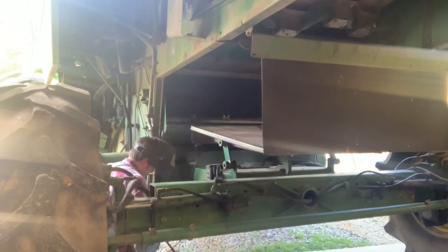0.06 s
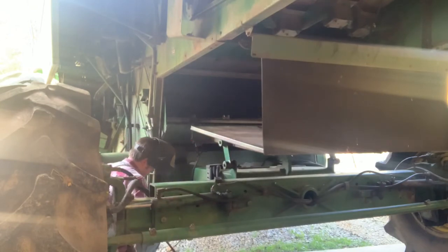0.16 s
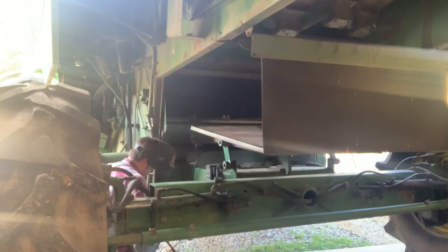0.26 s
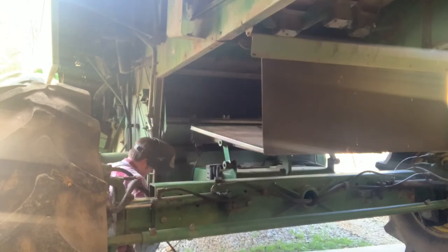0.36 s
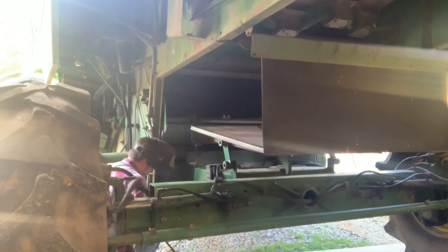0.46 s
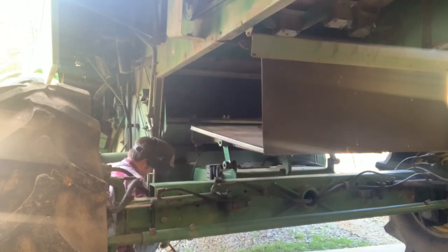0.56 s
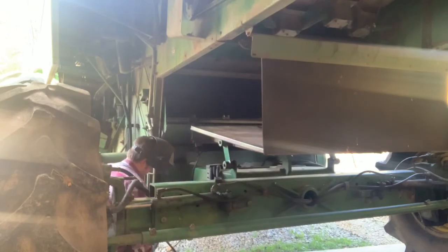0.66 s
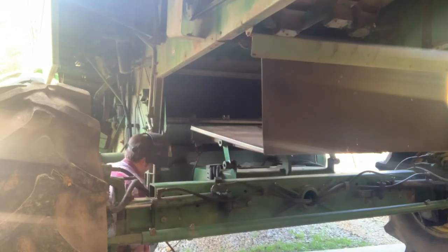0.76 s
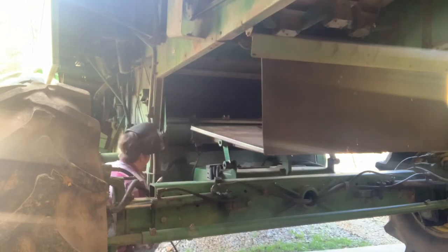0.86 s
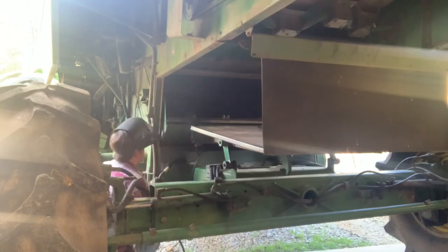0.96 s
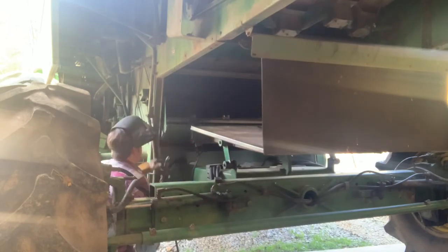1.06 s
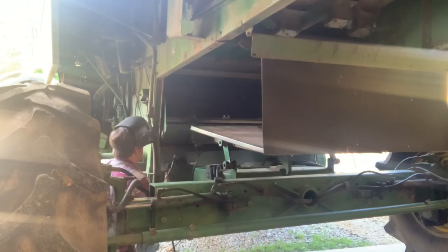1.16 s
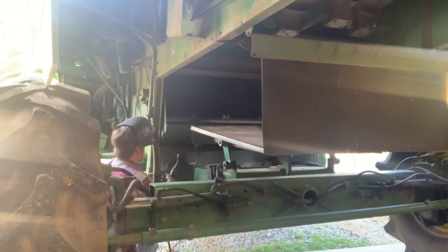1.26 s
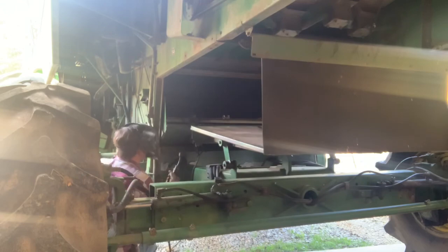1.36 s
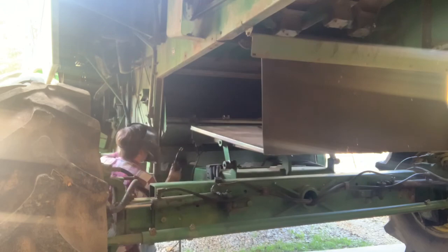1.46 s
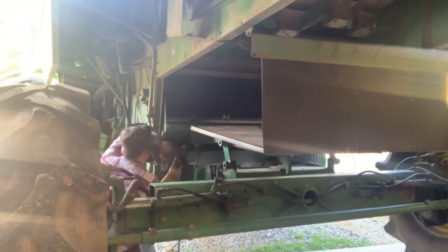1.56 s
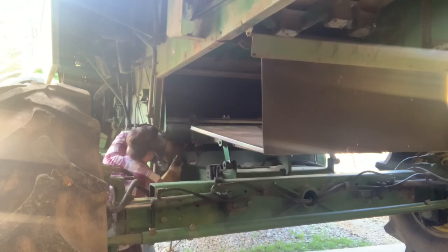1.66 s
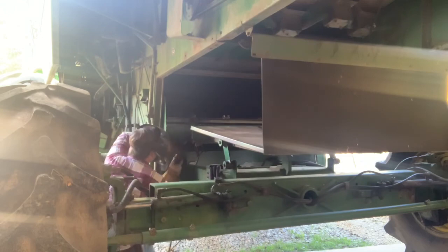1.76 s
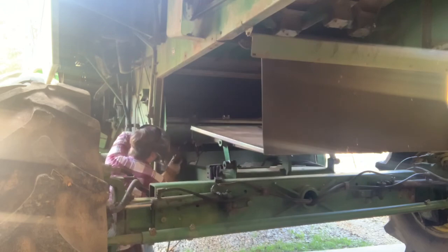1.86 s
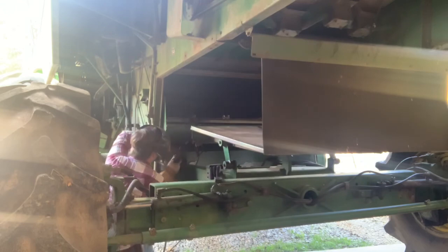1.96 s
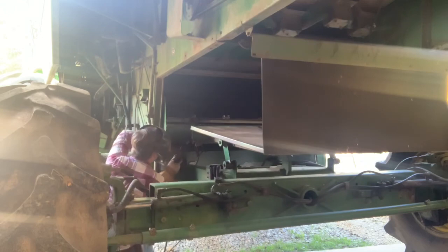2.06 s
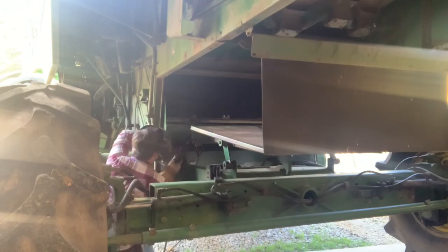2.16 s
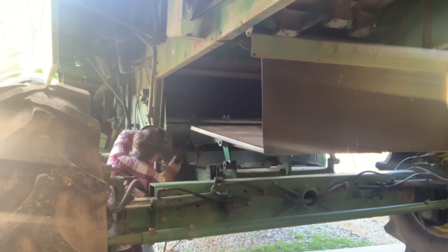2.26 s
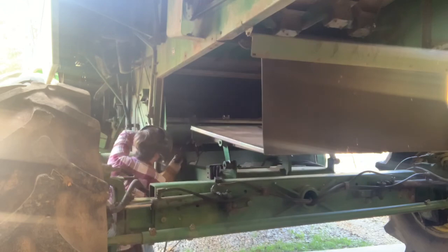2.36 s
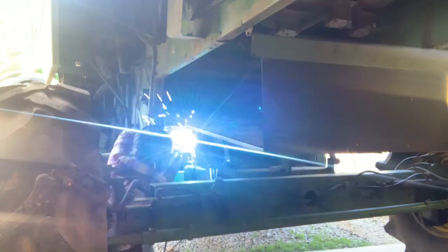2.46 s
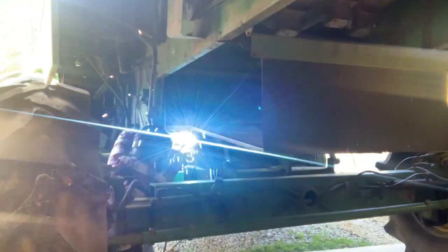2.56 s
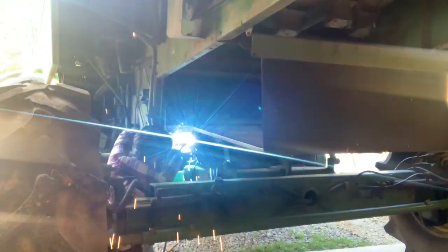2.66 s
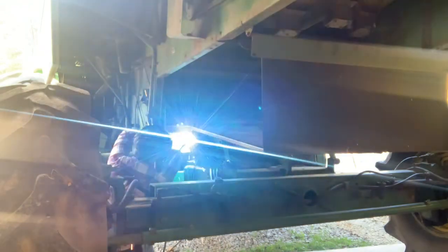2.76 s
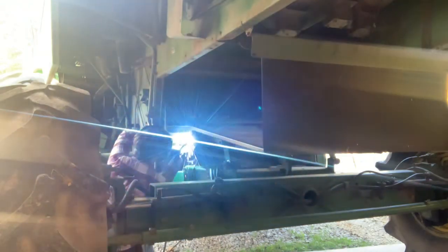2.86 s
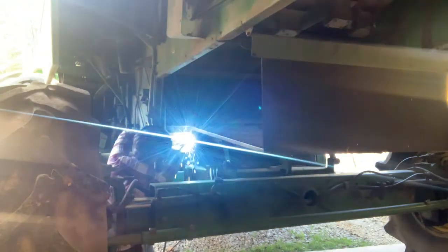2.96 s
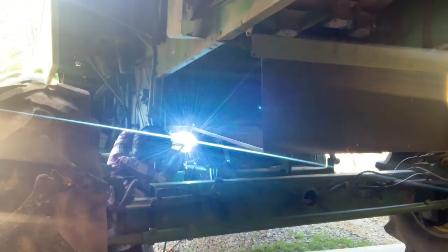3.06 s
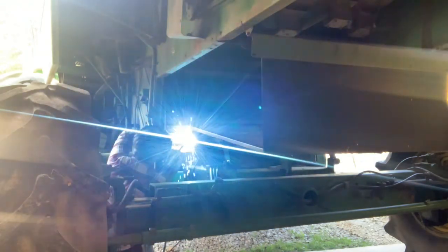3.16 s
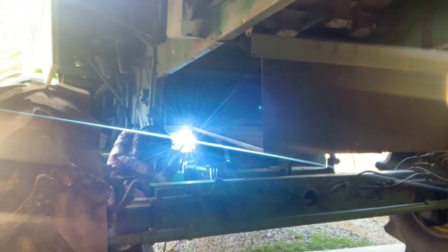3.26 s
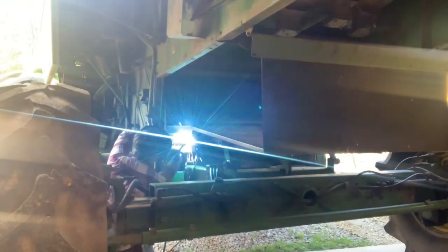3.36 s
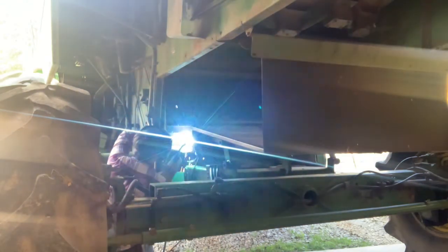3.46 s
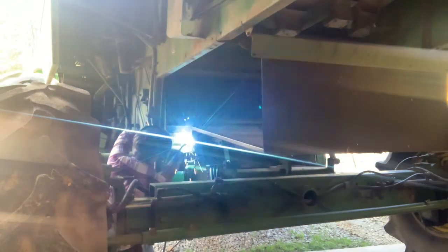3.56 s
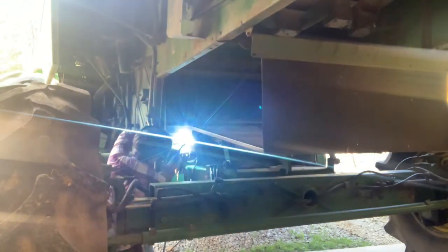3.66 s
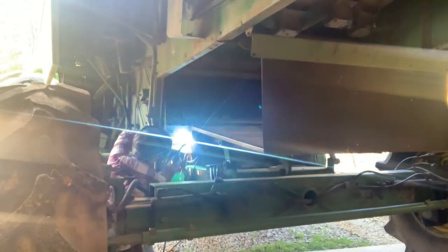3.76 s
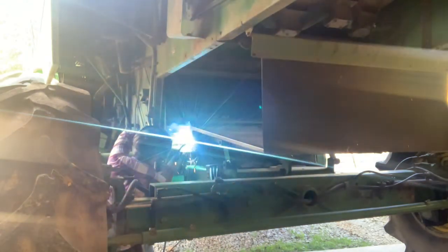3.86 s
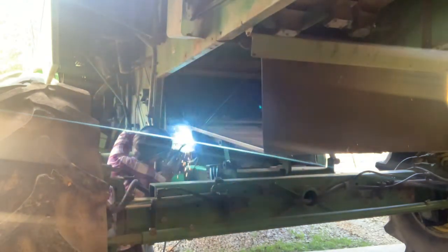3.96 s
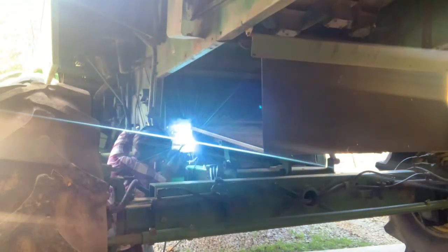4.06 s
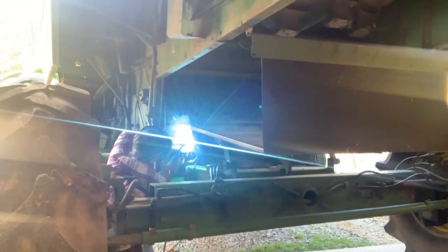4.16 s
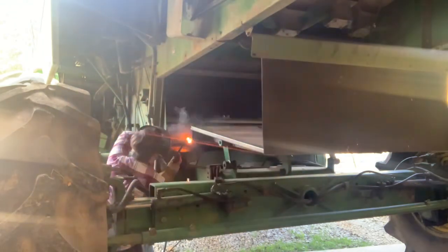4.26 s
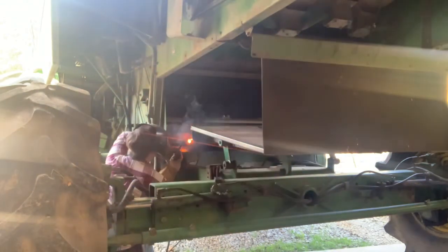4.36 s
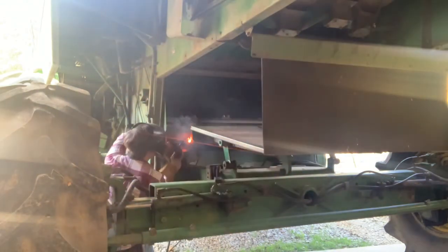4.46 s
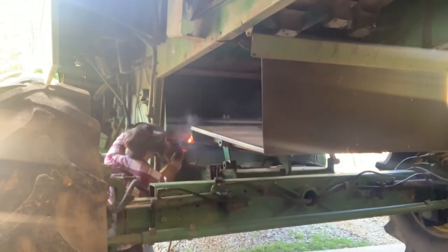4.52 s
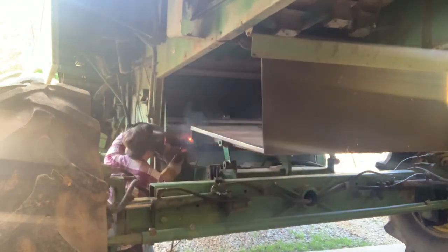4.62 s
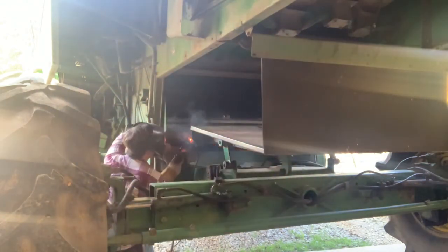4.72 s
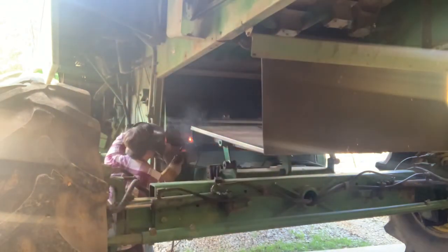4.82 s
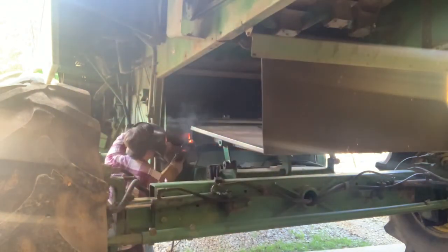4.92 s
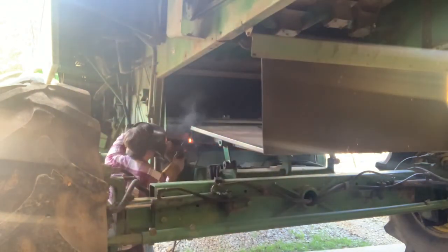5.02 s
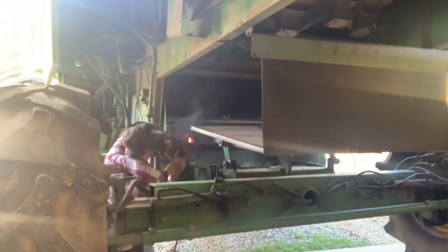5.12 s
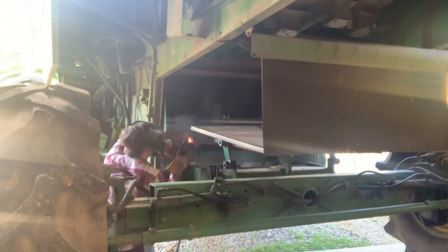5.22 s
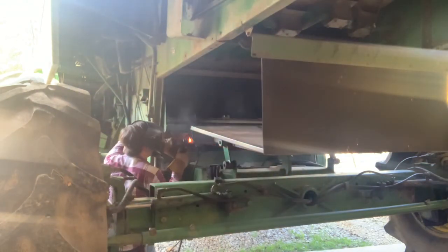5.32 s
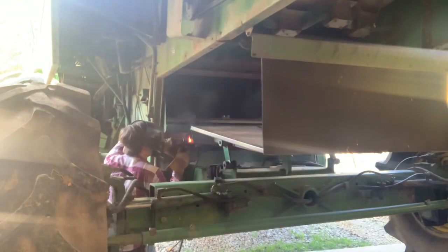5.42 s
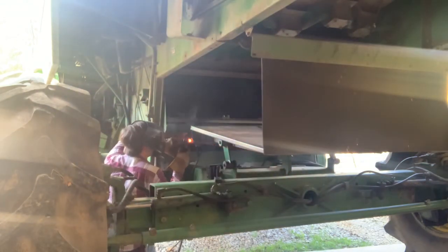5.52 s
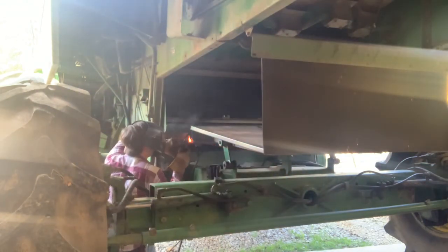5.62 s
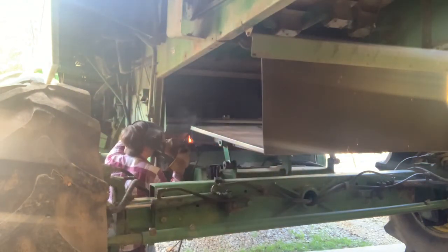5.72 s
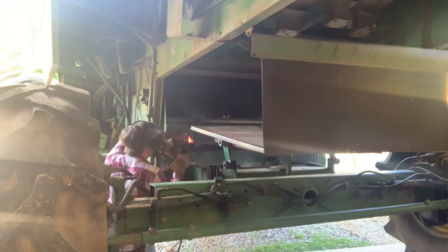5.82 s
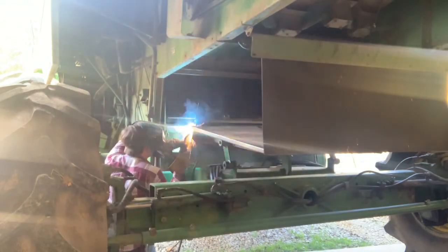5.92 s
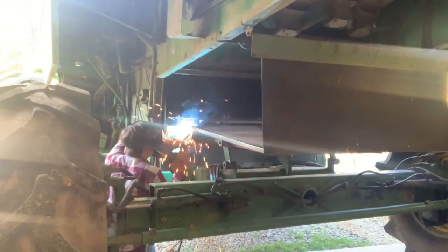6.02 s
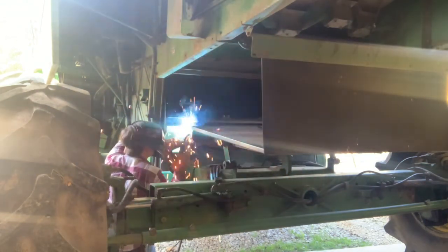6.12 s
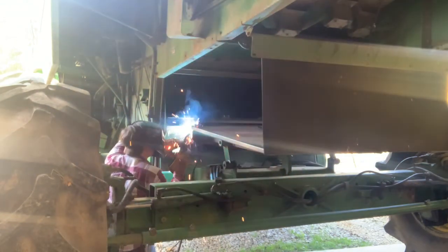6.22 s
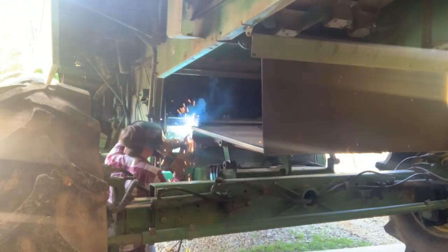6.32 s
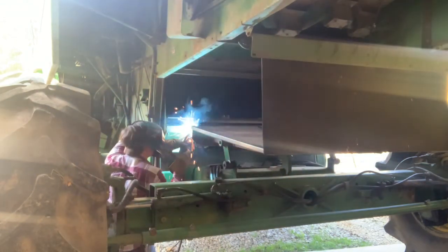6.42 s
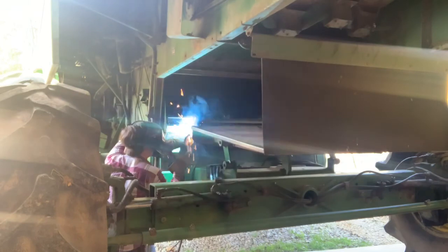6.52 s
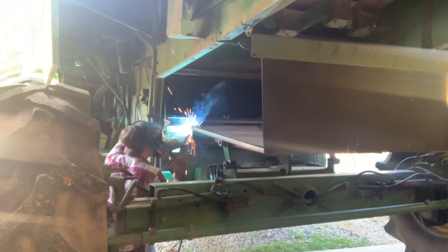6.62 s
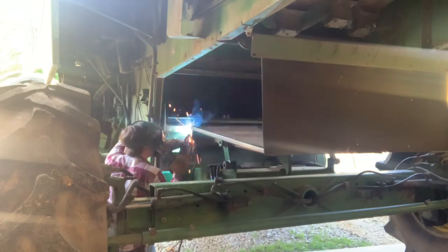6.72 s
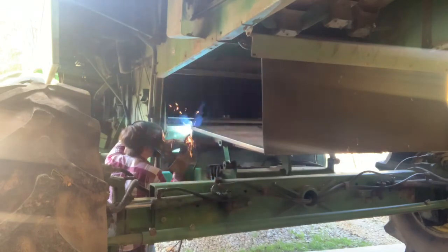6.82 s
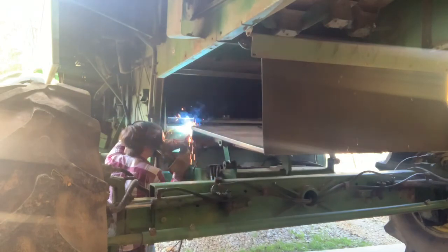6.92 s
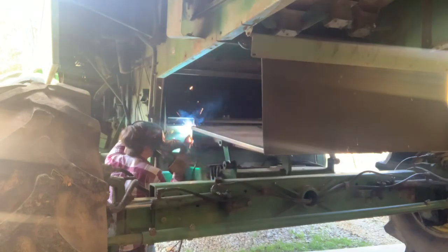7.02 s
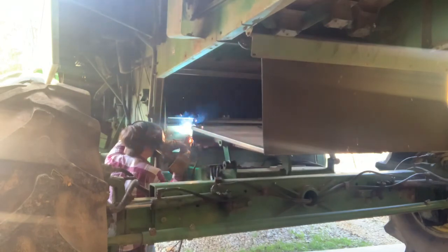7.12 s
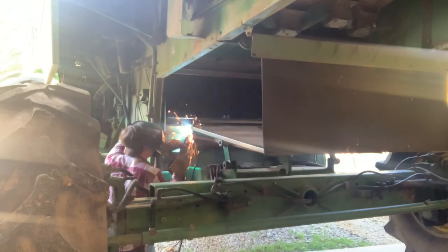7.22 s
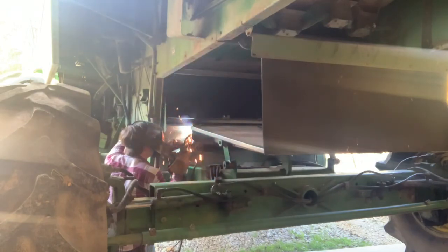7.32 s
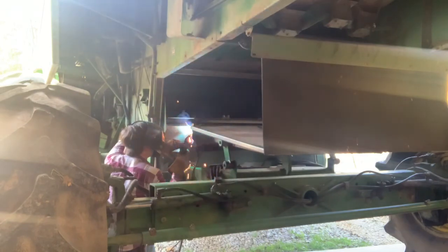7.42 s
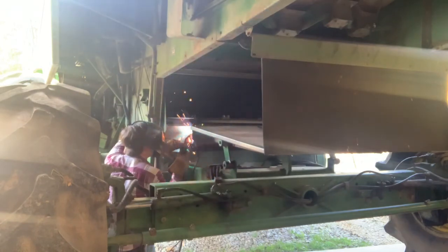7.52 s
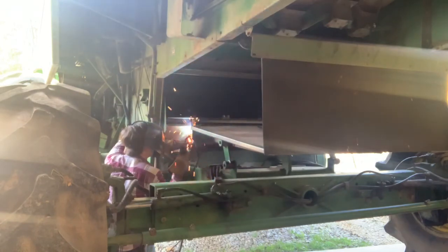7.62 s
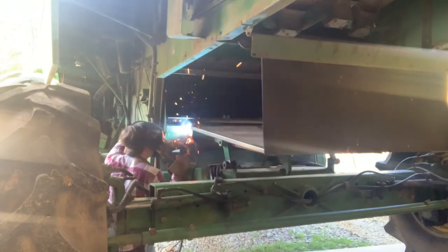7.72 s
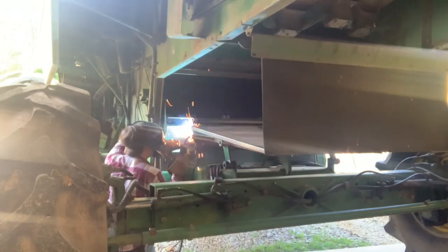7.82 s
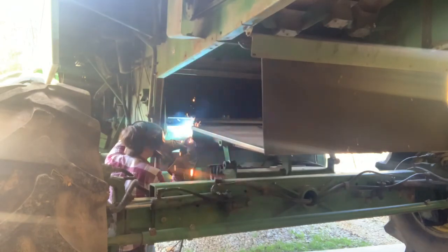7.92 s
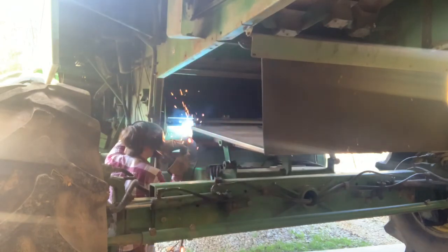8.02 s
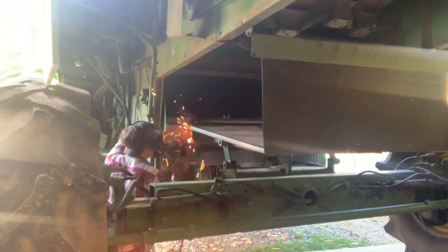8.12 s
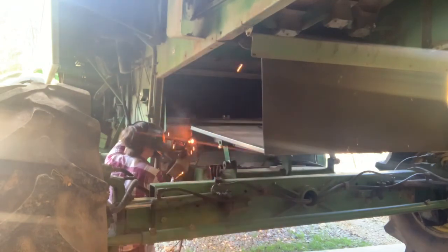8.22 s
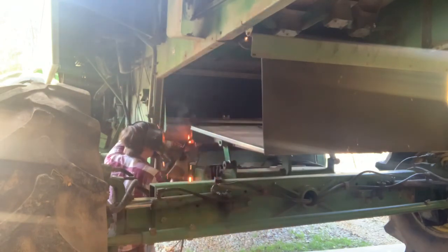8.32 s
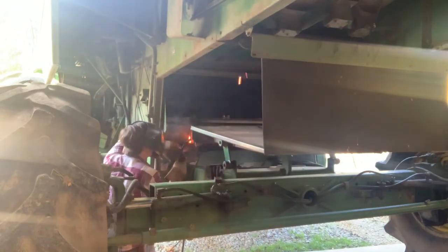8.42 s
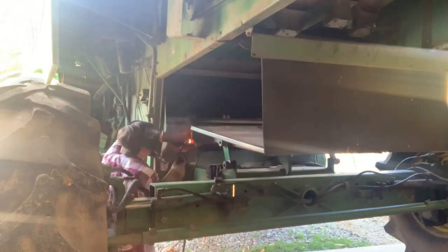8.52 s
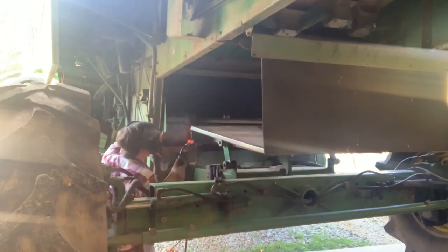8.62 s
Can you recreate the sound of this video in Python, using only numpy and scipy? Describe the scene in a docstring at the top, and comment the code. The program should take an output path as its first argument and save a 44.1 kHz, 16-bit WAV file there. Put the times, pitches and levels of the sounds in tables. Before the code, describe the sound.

Steady fan tone with soft air rush and motor drone, heard from a few metres off in an open shed. Light steel knocks and scrapes precede a first weld: violent pops, then uneven bright sizzling that rings nearby panels. It cuts off abruptly, leaving the hum. A second, grainier weld crackles for two seconds with a low gas roar beneath, stops suddenly, and a few hot slag ticks follow.

```python
"""A welder's cooling fan hums in an open shed, its pitch sagging under load, over a motor drone and faint whistles.
After a tick of handling and a brief clatter of steel gear, an arc is struck twice inside a large farm machine:
sharp pops, then a frying crackle that rings the steel panels around the seam. Hot slag ticks after the second weld.
The air, roar and gas flares are coloured noise, the fan and motor are tones, and every snap, pop, knock and tick
is an impulse or a tiny spit of noise sent through the ring of steel and the echoes of the shed."""
import sys
import numpy as np
from scipy import signal
from scipy.fft import rfft, irfft
from scipy.io import wavfile
from scipy.ndimage import uniform_filter1d

SR = 44100
rng = np.random.default_rng(int(sys.argv[2]) if len(sys.argv) > 2 else 0)


def transcribe(signal):
    """Save signal, clipped to [-1, 1], as a 16-bit WAV file at the path in sys.argv[1]."""
    frames = np.atleast_2d(signal).T
    limited = np.clip(frames, -1, 1)
    pcm = np.round(limited * 32767).astype(np.int16)
    wavfile.write(sys.argv[1], SR, pcm)


N = 382788
TIME, FREQS = np.arange(N) / SR, np.fft.rfftfreq(N, 1 / SR)

# The two welds. Each row: first touch, arc alight and arc broken in seconds, scratch of the touch in dB
# against the burning arc, surge on lighting in dB.
ARC_TIMES = [(2.358, 2.432, 4.187, -4, 6.5), (5.911, 5.964, 8.128, -7.5, 0)]


def amp(db):
    """Decibels to gain."""
    return 10 ** (np.asarray(db) / 20)


def unit(x):
    """Scales to an rms of one."""
    return x / np.sqrt(np.mean(x ** 2) + 1e-20)


def read(points, freqs=FREQS):
    """A spectrum table, joined by straight lines on a log-frequency axis."""
    hz, value = np.transpose(points)
    return np.interp(np.log(freqs + 1), np.log(hz), value)


def follow(rows):
    """The columns of a curve table at every sample."""
    seconds, *columns = np.transpose(rows)
    return [np.interp(TIME, seconds, column) for column in columns]


def add(mix, s, sound):
    """Mixes a stereo sound in at time s, cut off at the end of the mix."""
    part = mix[:, round(s * SR):][:, :sound.shape[1]]
    part += sound[:, :part.shape[1]]


def wander(rate):
    """Random drift of rms one, its movement falling away above rate in Hz."""
    slow = FREQS[:1000]
    noise = rng.standard_normal((len(slow), 2)) @ [1, 1j]
    curve = unit(irfft(noise / np.sqrt(1 + (slow / rate) ** 4), 8 * len(slow)))
    return np.interp(TIME, np.linspace(0, TIME[-1], len(curve)), curve)


def lifts(resonances, freqs):
    """Decibels that a table of resonances (Hz, width in Hz, lift in dB) adds at each frequency."""
    return sum(db / (1 + (2 * (freqs - hz) / width) ** 2) for hz, width, db in resonances)


def tilted(db_per_octave, freqs):
    """Decibels that brighten or dull the treble, sloping above 1500 Hz."""
    return db_per_octave * np.log2(np.maximum(freqs, 1500))


def air(colour):
    """Stereo noise of the given colour in the shed, most alike left and right in the low mids; mid rms of one."""
    # Likeness of left and right. Each row: frequency in Hz, correlation from 0 to 1.
    likeness_points = [(60, 0), (130, 0.48), (300, 0.62), (640, 0.69), (1400, 0.44), (3100, 0.32),
                       (7000, 0.14)]
    # Peaks and dips the shed's echoes leave in steady air. Each row: frequency and width in Hz, lift in dB.
    shed_rings = [(277, 18, 5.5), (526, 24, 2), (598, 24, 7.5), (620, 22, -4.5), (838, 49, 2.5),
                  (875, 21, -1.5), (1074, 44, -6), (1274, 37, -2), (1394, 43, -7.5), (1440, 55, 6.5),
                  (1625, 28, 7), (2060, 64, 4.5), (2520, 90, -3), (3000, 90, 2), (3240, 80, -12),
                  (3250, 80, 7), (3630, 200, -6), (6560, 260, 3.5), (7700, 98, 7)]
    common, apart = rfft(rng.standard_normal((2, N)))
    likeness = np.clip(read(likeness_points), -1, 1)
    mid = common * np.sqrt(1 + likeness)
    side = apart * np.sqrt(1 - likeness)
    gain = amp(read(colour) + lifts(shed_rings, FREQS))
    pair = irfft(np.array([mid + side, mid - side]) * gain, N)
    return pair / pair.mean(0).std()


def causal(db):
    """Minimum-phase response with the given gain: it rings after a click, never before."""
    log_gain = np.log(amp(np.maximum(db, db.max() - 80)))  # an 80 dB floor
    circle = np.r_[log_gain, log_gain[-2:0:-1]]
    return np.exp(np.conj(signal.hilbert(circle)))[:len(db)]


def evened(z, freqs):
    """Echoes cut a comb, left coarser in the treble, but the broad colour is made even."""
    fine, coarse = (uniform_filter1d(abs(z) ** 2, size=bins) for bins in (70, 180))
    return z * causal(-10 * np.log10(np.where(freqs < 3500, fine, coarse)))


def echoes(panel_s, panel_db, shed_db, side_db, shed_t60, side_t60=0.15, size=16384):
    """Spectrum of the path to the microphones: direct snap, a flurry off near panels, the shed's tail."""
    # Sideways share of the echoes. Each row: frequency in Hz, side minus mid in dB before side_db is added.
    side_share = [(300, -10), (1000, -6.5), (2000, -8), (2900, -13), (4500, -0.5), (8000, -9),
                  (13500, -6.5)]
    t, freqs = np.arange(size) / SR, np.fft.rfftfreq(size, 1 / SR)
    near, far, across = rng.standard_normal((3, size))
    near = near * np.exp(-t / panel_s)
    far = far * amp(-60 * t / shed_t60) * (1 - np.exp(-t / 0.00078))
    across = across * amp(-60 * t / side_t60) * (1 - np.exp(-t / .003))
    snap = (t == 0) * 1.0
    for db, part in [(panel_db, near), (shed_db, far)]:
        snap += amp(db) * part / np.linalg.norm(part)  # levels against the direct snap
    mid, side = (evened(rfft(part), freqs) for part in (snap, across))
    side = side * amp(read(side_share, freqs) + side_db)
    return freqs, np.array([mid + side, mid - side])


def ring(path, colour_db):
    """Stereo response to one click of the given colour, with unit energy in the mid."""
    response = irfft(path * causal(colour_db))
    return response / np.linalg.norm(response.mean(0))


def crack(response, db, length, count=8, size=2048):
    """A few fading snaps within length seconds, evened in colour; db spreads their energy over 3 ms."""
    snaps = np.zeros(size)
    place, sign = rng.random((2, count))
    at = np.clip((np.arange(count) + place) / count * length * SR, 0, size - 1).astype(int)
    snaps[at] = np.sign(sign - .5) * np.exp(-np.arange(count) / count)
    z = rfft(snaps)
    broad_power = uniform_filter1d(abs(z) ** 2, size=40)
    snaps = irfft(z * causal(-10 * np.log10(broad_power + 1e-9)))
    sound = signal.fftconvolve(response, snaps[None], axes=1)
    return amp(db) * np.sqrt(3 * SR / 1000) * sound / np.linalg.norm(sound.mean(0))


def fan_pitch(waver_hz=0.57):
    """The fan slows while an arc loads the supply and recovers when it breaks, with the rotor's lag."""
    idle_hz, sag_hz, lag_s = 407.5, 4.0, 0.079
    load = sum(1.0 * ((TIME > touch) & (TIME < broken)) for touch, _, broken, *_ in ARC_TIMES)
    keep = np.exp(-1 / (lag_s * SR))
    sag = sag_hz * signal.lfilter([1 - keep], [1, -keep], load)
    return idle_hz - sag + waver_hz * wander(1.94)


def fan(flutter=0.17, flutter_hz=12, tone_db=0.1, stray=0.17):
    """The blade tone flutters in its own turbulent air; stray echoes differ between the microphones."""
    # Swells and dips of the blade tone. Each row: time in seconds, level in dB before the tone_db trim.
    blade_level = [(0.0, -38), (0.05, -35.5), (0.19, -40), (1.35, -36.5), (1.4, -32.5), (1.52, -38),
                   (4.28, -36), (4.42, -39), (4.92, -36), (4.99, -30.5), (5.06, -37), (5.25, -38.5),
                   (5.7, -37.5), (5.78, -44), (5.85, -35), (7.91, -38), (8.12, -35), (8.68, -40.5)]
    # Rush of the fan's air in the shed. Each row: frequency in Hz, relative level per Hz in dB.
    rush_colour, rush_db = [(350, -23), (600, -0.5), (930, 0.5), (1130, -3), (1530, -4), (1750, -13),
                            (2050, -9), (2450, -12), (3100, -8.5), (3600, -13), (4400, -21.5), (6700, -23),
                            (8200, -28), (9800, -34.5), (14900, -59), (15600, -48)], -48
    (level_db,) = follow(blade_level)
    turn = np.exp(2j * np.pi * np.cumsum(fan_pitch()) / SR)
    shared, apart = (wander(flutter_hz) + 1j * wander(flutter_hz) for _ in range(2))
    opposite = np.array([[1], [-1]])  # left against right
    blade = (turn * (1 + flutter * shared + stray * opposite * apart)).real
    rush = amp(rush_db + .5 * wander(25)) * air(rush_colour)
    return np.sqrt(2) * amp(level_db + tone_db) * blade + rush


def motor(waver=0.3, waver_hz=4):
    """Motor and mains tones, wavering in level and phase (waver in radians), in the drone of the case."""
    # Each row: tone in Hz, level in dB before it wavers.
    motor_tones = [(240, -62.5), (351.3, -57), (468.4, -52), (585.5, -62), (702.6, -61.5), (936.8, -60.5)]
    # Drone of the welder's case. Each row: frequency in Hz, relative level per Hz in dB.
    drone_colour, drone_db = [(25, -62), (55, -51), (90, -21.5), (125, -15), (155, -20.5), (185, -10),
                              (215, -13.5), (315, -11), (338, 3), (378, 4), (400, -15.5), (422, -11),
                              (441, 1.5), (456, -1), (480, -4), (510, -7.5), (680, -45)], -43.5
    tones = np.zeros(N)
    for hz, db in motor_tones:
        swell = 1 + 0.48 * wander(waver_hz)
        tones += amp(db) * swell * np.cos(2 * np.pi * hz * TIME + waver * wander(waver_hz))
    return np.sqrt(2) * tones + amp(drone_db) * air(drone_colour)


def out_of_step(pair):
    """Fan and motor, bounced around the shed, reach the two microphones slightly out of step."""
    # Each row: frequency in Hz, lead of the left microphone over the right in radians.
    left_lead = [(100, 0), (405, .24), (520, .1), (720, -.7), (1290, -.8), (2000, .2), (2900, 1),
                 (4100, 2.3)]
    half_lead = np.array([[.5], [-.5]]) * read(left_lead)
    return irfft(rfft(pair) * np.exp(1j * half_lead), N)


def whistles(spread_hz=22):
    """Faint thin whistles: high tones slightly unsteady in pitch."""
    # Each row: pitch in Hz, level in dB.
    whistle_tones = [(11010, -83), (11950, -90), (14880, -80)]
    tones = np.zeros(N)
    for hz, db in whistle_tones:
        pitch = hz + spread_hz * wander(60)
        tones += amp(db) * np.cos(2 * np.pi * np.cumsum(pitch) / SR)
    return np.sqrt(2) * tones


def clicks(click_db=2):
    """Small hard ticks of handling, then of cooling slag: short snaps, each with its own echoes."""
    # Each row: start in seconds, level in dB before the click_db trim, brightness in dB per octave.
    tick_rows = [(.355, -53, -5), (0.385, -39.5, -8), (1.048, -48, -7.5), (8.2925, -45, -2),
                 (8.446, -49, -3), (8.4648, -48, -4)]
    # Colour of a tick. Each row: frequency in Hz, relative level per Hz in dB.
    tick_colour = [(300, -26), (1200, -19), (2100, 0.5), (3600, -1), (4800, -7), (6500, -6), (10000, -1),
                   (16000, -3)]
    out = np.zeros((2, N))
    for s, db, tilt in tick_rows:
        freqs, path = echoes(panel_s=0.0033, panel_db=7, shed_db=5.0, side_db=3.0, shed_t60=0.33)
        response = ring(path, read(tick_colour, freqs) + tilted(tilt, freqs))
        add(out, s, crack(response, db + click_db, length=0.0011))
    return out


def clatter(clatter_db=-1.0):
    """Steel gear knocks and scrapes as it is picked up: each contact is a run of tiny slips that ring the steel."""
    # Each row: start in seconds, level in dB before the clatter_db trim, length in seconds,
    # brightness in dB per octave.
    contacts = [(.7428, -42, 0.00087, 0), (.776, -46, .0015, -7), (.7941, -36, 0.00074, -6),
                (0.806, -35, 0.0018, 3), (0.8104, -36.5, .0022, 1), (0.82, -40, .009, -4),
                (.8732, -40.5, .0016, -1), (.919, -46, .0044, -1)]
    # Colour of the steel. Each row: frequency in Hz, relative level per Hz in dB.
    steel_colour = [(300, -30), (1500, -16), (2600, -8), (3700, 0.5), (5200, -1), (6700, -6), (8000, -4),
                    (10000, -0.5), (12400, -6), (13200, -3), (16000, -6)]
    # Ringing of the steel. Each row: frequency in Hz, width in Hz, lift in dB.
    steel_rings = [(3900, 250, 3), (4680, 260, 4.5), (4930, 260, 4.4), (9800, 400, 1), (13100, 300, 2)]
    out = np.zeros((2, N))
    for s, db, length, tilt in contacts:
        freqs, path = echoes(panel_s=0.0016, panel_db=5, shed_db=4.0, side_db=4.0, shed_t60=0.33)
        colour_db = read(steel_colour, freqs) + lifts(steel_rings, freqs) + tilted(tilt, freqs)
        add(out, s, crack(ring(path, colour_db), db + clatter_db, length, count=20))
    return out


def sputter(spread_db, snaps_per_s, evenness, fizz_db, surge_db, fizz_per_s=3000, spit_s=0.00036,
            spit_fizz_db=-15, snap_ripple=0.2, spit_ripple=0.25, count=6000):
    """Droplets short the arc at loosely regular moments over fine fizz: each gives a snap and a spit of noise."""
    gaps = np.exp(rng.standard_normal(count) / np.sqrt(evenness))
    at = (np.cumsum(gaps / gaps.mean()) / snaps_per_s * SR).astype(int)
    sizes = amp(spread_db * np.minimum(rng.standard_normal(count), 1.6))
    snaps = np.zeros(N)
    snaps[at[at < N]] = sizes[at < N]
    fizz = unit(rng.standard_normal(N) * (rng.random(N) < fizz_per_s / SR))
    spit_power = signal.lfilter([1], [1, -np.exp(-2 / (spit_s * SR))], snaps ** 2 + 1e-12)
    spits = np.sqrt(spit_power) * rng.standard_normal(N)
    current = np.sin(2 * np.pi * 240 * TIME)  # the current's ripple pulses both
    surge = amp(surge_db * wander(30))
    grain = []
    for x, db, ripple in [(snaps, fizz_db, snap_ripple), (spits, spit_fizz_db, spit_ripple)]:
        grain.append(unit((unit(x) + amp(db) * fizz) * (1 + ripple * current) * surge))
    return grain


def restless(x, patchy_db=1.15, patch_hz=600, patch_s=.04):
    """The colour of the snaps keeps shifting in small patches of pitch and time."""
    freqs, times, z = signal.stft(x, SR, nperseg=128)
    patches = rng.standard_normal(z.shape)
    for axis, steps in enumerate([patch_hz / freqs[1], patch_s / times[1]]):
        patches = uniform_filter1d(patches, max(round(steps), 1), axis)
    patchy = z * amp(patchy_db * unit(patches))
    return unit(signal.istft(patchy, SR, nperseg=128)[1][:N])


def resonate(x, hz, width):
    """A resonance of gain one that follows the curve hz."""
    turn, r = np.exp(2j * np.pi * np.cumsum(hz) / SR), np.exp(-np.pi * width / SR)
    return 2 * (turn * signal.lfilter([1 - r], [1, -r], x / turn + 1e-18)).real


def roar(burning):
    """Low roar of the arc's hot gas: dark noise that lasts as long as the arc."""
    # Each row: frequency in Hz, relative level per Hz in dB.
    roar_colour, roar_db = [(30, -37), (70, -25), (130, -2), (200, -5), (350, -2), (700, -0.5),
                            (1200, -11.5), (2500, -10.5)], -44
    return amp(roar_db) * burning * air(roar_colour)


def pops(touch, broken, seam_db):
    """The rod shorts and bursts free: pops, large and small, ring the seam with weak shed echoes and a hard crack."""
    # Each row: start in seconds, level in dB, length in seconds, brightness in dB per octave,
    # lift of the bite in dB.
    pop_rows = [(2.3882, -13.5, .002, -1.7, -4), (2.4121, -13.5, .0018, -1.3, -1),
                (2.429, -11.5, 0.0019, -1.5, -5), (2.445, -25, 0.0011, 4, 0), (2.4505, -15, .0074, 5, 4),
                (2.498, -29, 0.00083, -2, 0), (2.514, -26, 0.0013, 0, 0), (2.8284, -20, .0013, 0.5, -1),
                (2.8565, -20, .0013, 2.5, -4), (2.933, -23, 0.0013, -2.5, -4),
                (2.974, -22.5, 0.001, -.7, 9), (3.138, -26, .0008, -3, 2), (3.504, -22, 0.00037, -1.5, -2),
                (3.66, -24.5, 0.00061, -2, -2), (3.737, -29, 0.00071, 0, 0), (3.804, -29, 0.00074, -3, 0),
                (4.17, -40, .0008, 0, 0), (5.9332, -17.5, .003, -3.5, -8), (5.9612, -12, .001, -1, 2),
                (5.99, -19.5, 0.00079, -1.5, -1), (6.005, -18.5, 0.0012, 0.5, -1),
                (6.19, -27, 0.00058, -2, 0), (6.2205, -21, 0.00098, 0, 1), (6.848, -29.5, 0.00063, -5, 2),
                (7.003, -27, .0007, -4, 2), (7.2355, -30.5, 0.0022, -5, 0), (7.451, -30, 0.00092, -2.5, 0),
                (7.664, -30, 0.0011, -3, -2)]
    # Colour of a pop against the steady crackle. Each row: frequency in Hz, difference in dB.
    pop_colour = [(100, -20), (600, -4.5), (1500, -5.5), (2700, 3), (3300, 2), (4300, -1.5), (5500, -3),
                  (8000, 3), (13000, 2.5)]
    bite_hz, bite_width_hz = 4800, 1500
    out = np.zeros((2, N))
    freqs, path = echoes(panel_s=0.0026, panel_db=3, shed_db=-4.5, side_db=-0.5, shed_t60=0.21, side_t60=.04)
    for s, db, length, tilt, bite_db in pop_rows:
        if touch <= s <= broken:
            own_db = tilted(tilt, freqs) + lifts([(bite_hz, bite_width_hz, bite_db)], freqs)
            response = ring(path, seam_db + read(pop_colour, freqs) + own_db)
            add(out, s, crack(response, db, length))
    return out


def weld(arc, burn, hiss_peak, seam, hollow, grain, room, crackle_db, sizzle_db, hiss_db, flicker_db=1.05):
    """One weld: the rod scratches, pops, then burns; every snap rings the steel hollow around the seam."""
    touch, alight, broken, touch_db, surge_db = arc
    scratch = amp(touch_db)
    burning = np.interp(TIME, [touch, touch + 0.0041, alight - .01, alight, broken, broken + 0.0038],
                        [0, scratch, scratch, 1, 1, 0])
    # a fresh arc settles within about settle_s, and flickers at random
    settle_s, heat_flicker_db, heat_flicker_hz = 0.07, 0.36, 8.1
    heat_db = surge_db * (TIME > alight) * np.exp(-abs(TIME - alight) / settle_s)
    heat_db = heat_db + heat_flicker_db * wander(heat_flicker_hz)
    snaps, spits = (restless(x) * burning * amp(heat_db) for x in grain)

    freqs, path = room
    seam_db = read(seam, freqs) + lifts(hollow, freqs)
    seam_db -= 10 * np.log10(1 + (130 / (freqs + 1)) ** 4)  # so small a source makes no deep bass
    body = path * causal(seam_db)
    # the crackle gives way to sizzle, and the sizzle to hiss, at these frequencies
    sizzle_from_hz, hiss_from_hz = 4360, 11260
    treble = 1 / (1 + (sizzle_from_hz / (freqs + 1)) ** 12)
    top = 1 / (1 + (hiss_from_hz / (freqs + 1)) ** 30)
    crackle, sizzle, hiss = follow(burn)
    bands = [(snaps, 1 - treble, crackle + crackle_db),
             (spits, treble - top, sizzle + sizzle_db),
             (spits, top, hiss + hiss_db)]
    out = roar(burning)
    for drive, share, db in bands:
        flickering = drive * amp(db + flicker_db * wander(25))
        band = irfft(rfft(flickering) * np.interp(FREQS, freqs, share), N)
        rung = signal.oaconvolve(band[None], irfft(body), axes=1)[:, :N]
        out += rung / np.linalg.norm(irfft(body.mean(0) * share))
    out += pops(touch, broken, seam_db)
    peak_hz, lift_db = follow(hiss_peak)
    return out + (amp(lift_db) - 1) * resonate(out, peak_hz, width=500)


def flares():
    """Short puffs of hot gas as the arc catches, pops or breaks: low noise that swells softly and fades."""
    # Each row: start in seconds, level in dB before the soft onset and fade, fade time in seconds.
    puffs = [(2.385, -29.5, 0.041), (2.424, -29, 0.033), (4.186, -35.5, 0.044), (5.928, -35.5, 0.073),
             (6.221, -40, 0.02), (8.122, -33.5, 0.052)]
    # Colour of the gas. Each row: frequency in Hz, relative level per Hz in dB.
    gas_colour = [(30, -40), (80, -10), (170, -14.5), (330, 8), (750, 1.5), (1300, -4.5), (2500, -16.5)]
    level = np.zeros(N)
    for s, db, fade in puffs:
        age = np.maximum(TIME - s, 0)
        level += amp(db) * np.exp(-age / fade) * (1 - np.exp(-(age / .005) ** 2))
    return level * air(gas_colour)


def scene():
    """Fan, motor, whistles, ticks, the clatter of gear, a fizzier first weld and a second of more distinct snaps."""
    # Drift of each arc as the rod is fed, one list per weld. Each row: time in seconds, then the levels of
    # the crackle, the treble sizzle and the top hiss in dB, before the trims below.
    burns = [
        [(2.53, -38.5, -42, -37.5), (2.76, -37.5, -42.5, -36.5), (2.84, -43.5, -47, -40),
         (2.92, -43.5, -51, -41), (2.945, -35, -41.5, -35), (3.03, -36.5, -39.5, -35), (3.11, -43.5, -46, -38),
         (3.16, -33.5, -40, -34), (3.29, -38, -42, -37), (3.42, -35.5, -38.5, -34), (3.51, -37.5, -42, -37),
         (3.57, -38.5, -44.5, -38), (3.65, -36, -39, -33), (3.75, -38.5, -47, -41), (3.81, -35.5, -39.5, -34),
         (3.9, -38.5, -44, -39), (4.16, -36.5, -42, -40)],
        [(5.98, -36.5, -36.5, -39), (6.04, -36.5, -40.5, -39), (6.09, -31, -38.5, -41), (6.19, -36, -42, -40),
         (6.25, -35, -43, -38), (6.33, -36, -41.5, -44), (6.55, -34, -43.5, -44), (6.67, -34, -40.5, -47),
         (6.9, -37, -45.5, -44.5), (6.99, -36.5, -43, -42), (7.2, -38.5, -42.5, -45), (7.27, -38, -39.5, -38),
         (7.36, -37, -38.5, -31), (7.43, -39, -45.5, -44), (7.57, -38.5, -41.5, -38), (7.69, -39, -39.5, -42),
         (7.73, -41.5, -46, -47), (8.04, -38, -41, -43), (8.11, -41, -46, -50)],
    ]
    # The hiss peak or dip shifts as the rod moves along the seam, one list per weld.
    # Each row: time in seconds, frequency in Hz, lift in dB.
    hiss_peaks = [
        [(2.45, 14300, 0), (2.75, 14300, 2), (2.85, 15100, 1), (2.97, 14400, -2), (3.17, 14300, -3),
         (3.3, 13700, -2), (3.44, 12790, 5), (3.68, 12700, 4), (3.82, 13100, 5.5), (4.15, 13300, 6.5)],
        [(6.0, 13400, -6), (6.14, 13400, 9), (6.23, 13350, 7), (6.42, 13400, 2), (6.85, 13500, 8.5),
         (7.1, 13400, -6), (7.35, 13600, -3), (7.48, 14400, 6), (7.58, 14500, 7), (7.75, 14650, 6),
         (8.1, 14350, 8)],
    ]
    # Colour of the steel hollow around each seam. Each row: frequency in Hz, relative level per Hz in dB.
    seam_1, seam_2 = [(290, -41.5), (500, -12.5), (1000, -7), (1340, -17), (2010, -8), (2290, -11.5),
                      (3020, -1), (3390, -8), (4090, -17), (4800, -13), (6140, -17.5), (7530, -17.5),
                      (11000, -15), (13000, -6), (14200, -6.5), (16000, -7.5)], [(290, -25), (500, -6.5), (668, -10.5), (919, -2.5), (1320, -10.5),
                                      (1570, -11), (1900, -5.5), (2390, 3), (2650, 2.5), (3150, -7.5),
                                      (4870, -14.5), (6420, -11.5), (10100, -12), (13600, -7),
                                      (16000, -6.5)]
    # Resonances of that hollow. Each row: frequency in Hz, width in Hz, lift in dB.
    hollow_1, hollow_2 = [(1090, 70, -7), (1165, 80, 5), (1573, 90, 4), (2415, 190, -9.5),
                          (2800, 150, -2.5), (3070, 220, 2), (3390, 125, -17.5), (3580, 120, 1),
                          (3820, 110, 6), (4635, 79, 10), (4980, 190, 3.5), (6560, 220, 0), (7490, 420, 7),
                          (9800, 300, 1.5), (11250, 500, -3), (11800, 500, 5), (11900, 200, -2),
                          (15300, 350, 0)], [(1100, 82, -6), (1370, 100, -3), (1650, 130, -2),
                                            (1880, 110, 8), (2388, 200, -10.5), (2840, 180, -1),
                                            (2980, 100, 0), (3220, 80, -2), (3380, 140, 2.5),
                                            (4450, 110, 0), (4570, 120, 4), (5480, 400, 5), (5800, 270, -4),
                                            (6650, 550, 4.5), (8600, 300, -6), (10280, 530, -10.5),
                                            (10540, 420, 5.5), (12200, 300, 6.5), (15300, 350, -1)]
    fizzy = sputter(spread_db=-0.3, snaps_per_s=185, evenness=10, fizz_db=-4.5, surge_db=0.43)
    snappy = sputter(spread_db=1.9, snaps_per_s=215, evenness=8, fizz_db=-11.5, surge_db=.4)
    drier = echoes(panel_s=0.0018, panel_db=2.5, shed_db=1.0, side_db=0.0, shed_t60=0.15)
    livelier = echoes(panel_s=0.0026, panel_db=3.0, shed_db=3.7, side_db=1.3, shed_t60=.18)
    first = weld(ARC_TIMES[0], burns[0], hiss_peaks[0], seam_1, hollow_1, fizzy, drier,
                 crackle_db=0, sizzle_db=-1.3, hiss_db=1.5)
    second = weld(ARC_TIMES[1], burns[1], hiss_peaks[1], seam_2, hollow_2, snappy, livelier,
                  crackle_db=0.33, sizzle_db=-0.47, hiss_db=1.5)
    steady = out_of_step(fan() + motor()) + whistles()
    return steady + clicks() + clatter() + first + second + flares()


def record(dry):
    """Two microphone ports of unequal colour, then the band limit."""
    # Microphone balance. Each row: frequency in Hz, left minus right in dB.
    balance = [(50, 2), (110, 5.5), (200, 5), (330, .3), (480, 0), (900, -.6), (2400, .2), (4400, .9),
               (8000, 3), (15000, 2.4)]
    cutoff_hz = 15830
    lean = amp(np.array([[.5], [-.5]]) * read(balance))
    heard = irfft(rfft(dry) * lean / lean.mean(0), N)
    low_pass = signal.firwin(511, cutoff_hz, window=("kaiser", 9), fs=SR)
    return signal.oaconvolve(heard, low_pass[None], "same")


dry = scene()
out = record(dry)
transcribe(out)
```